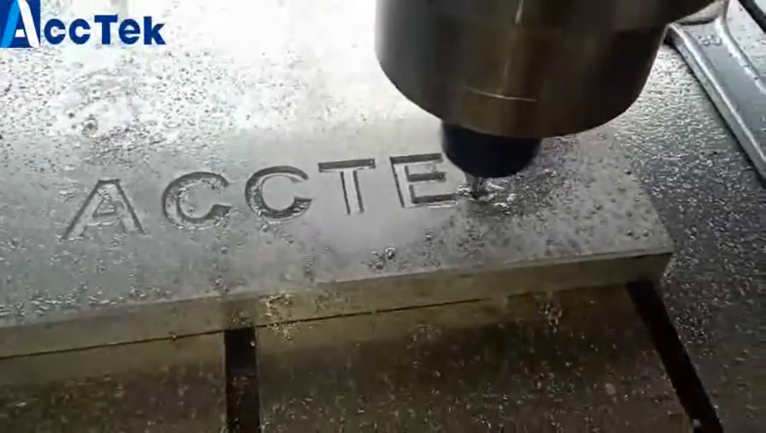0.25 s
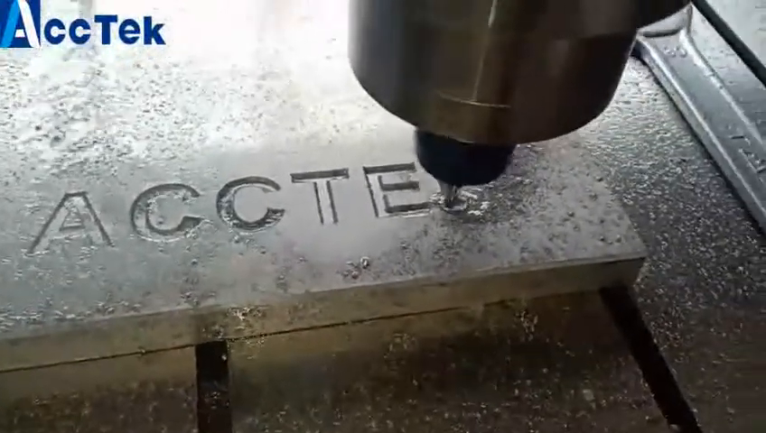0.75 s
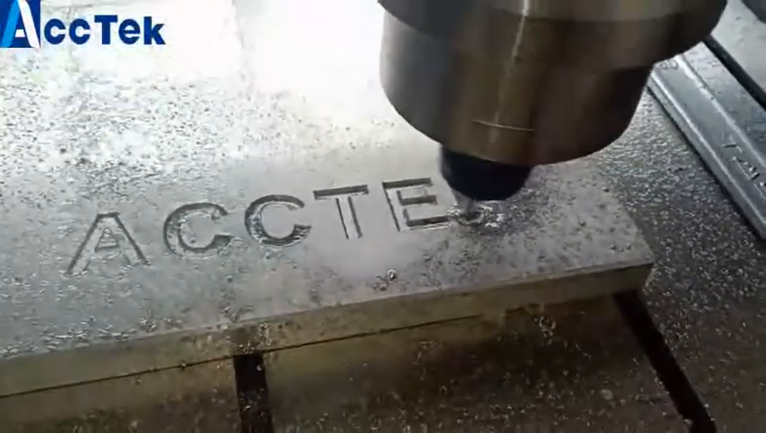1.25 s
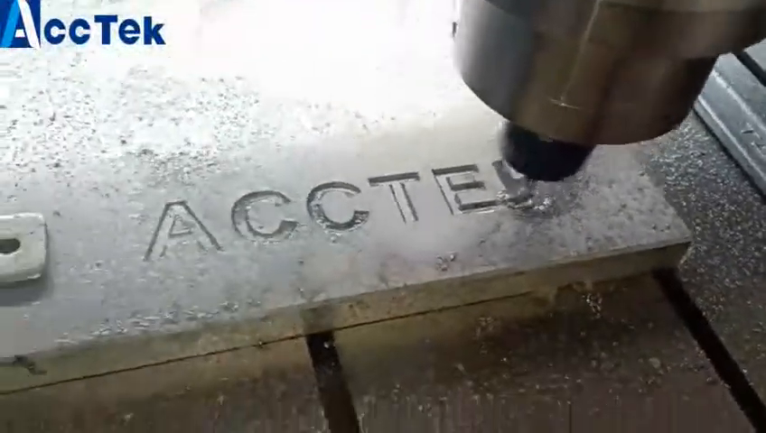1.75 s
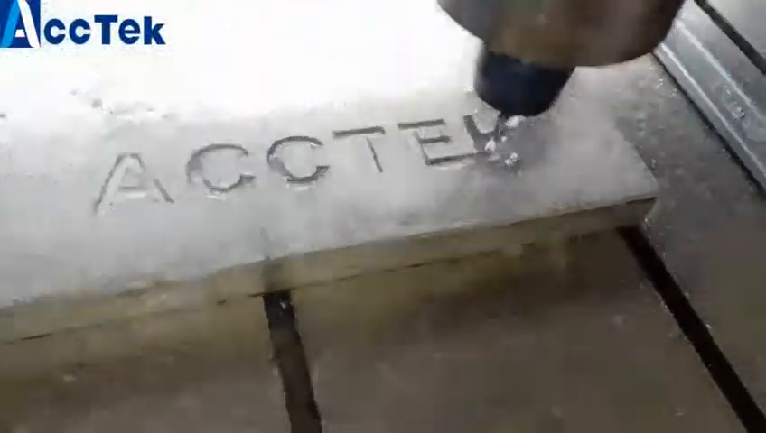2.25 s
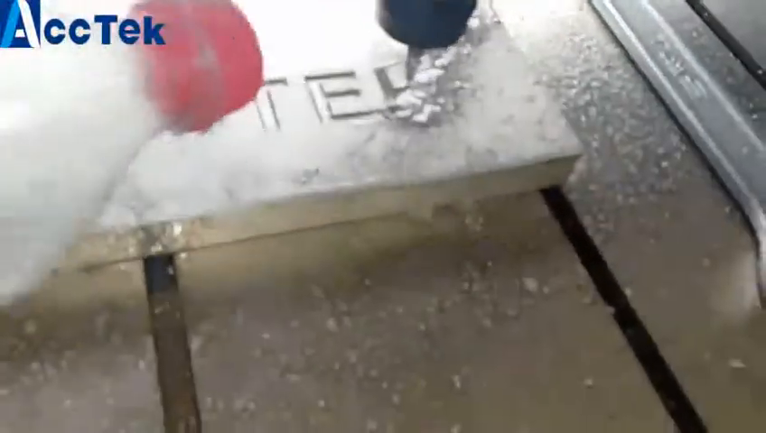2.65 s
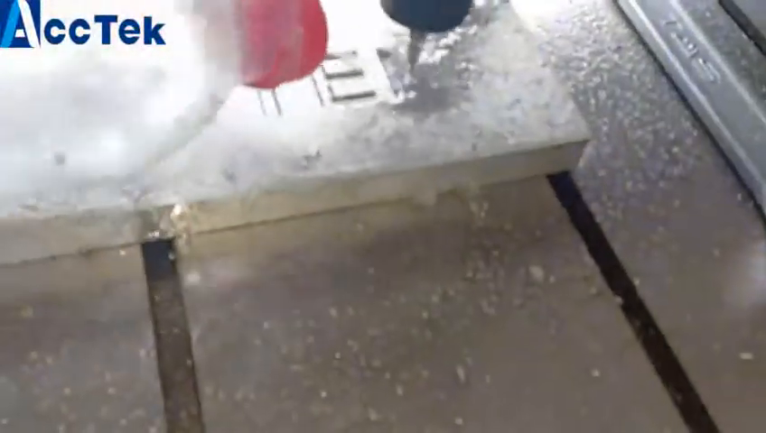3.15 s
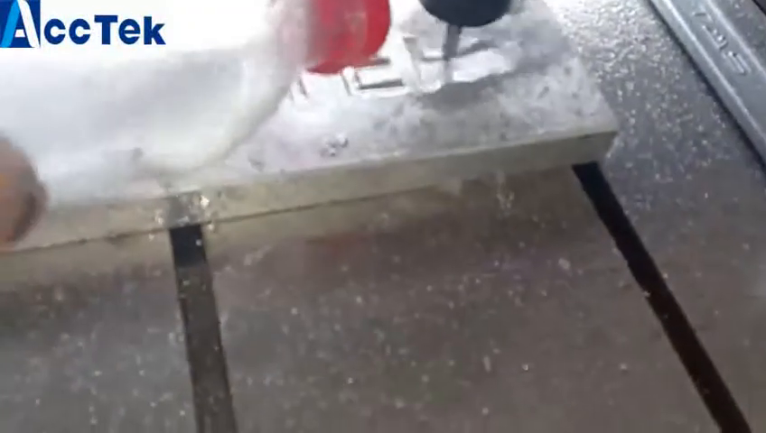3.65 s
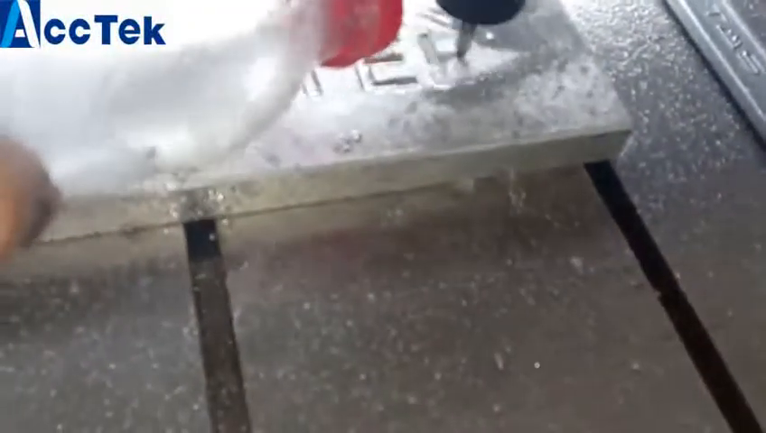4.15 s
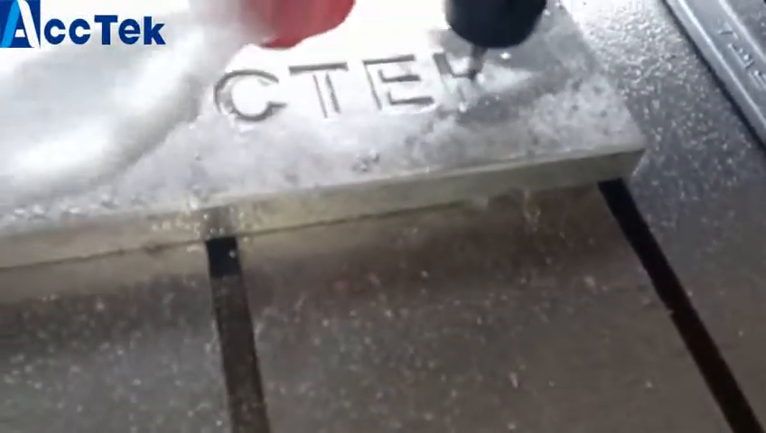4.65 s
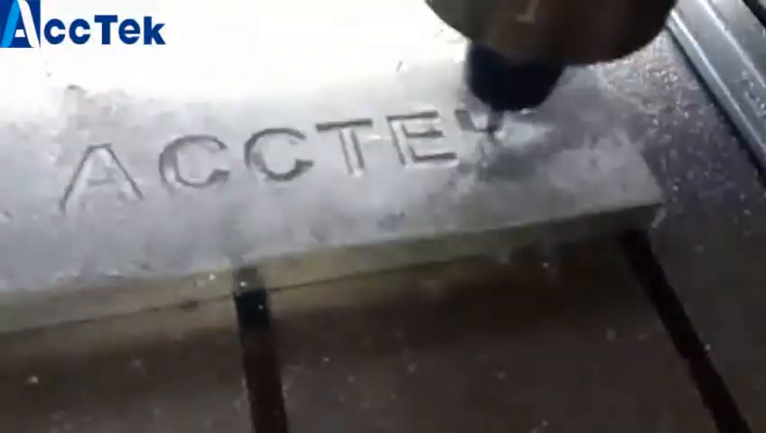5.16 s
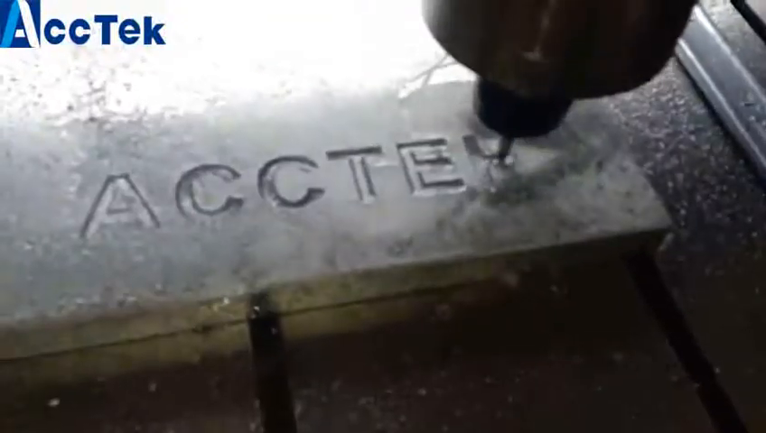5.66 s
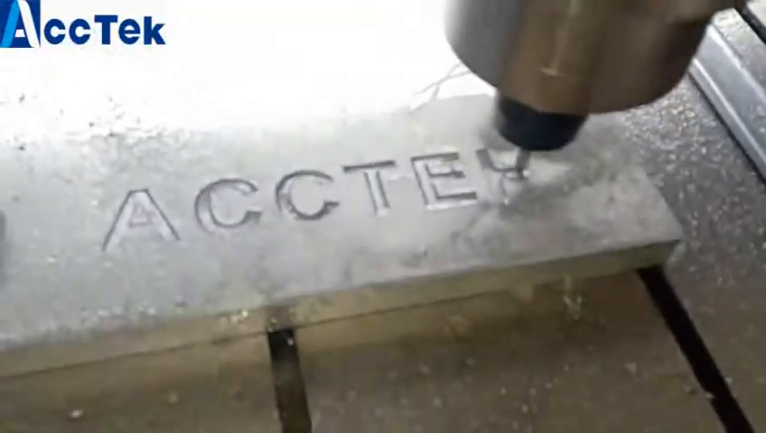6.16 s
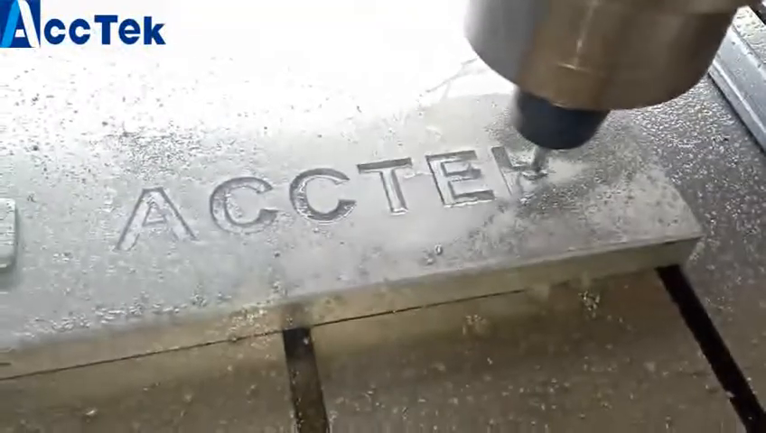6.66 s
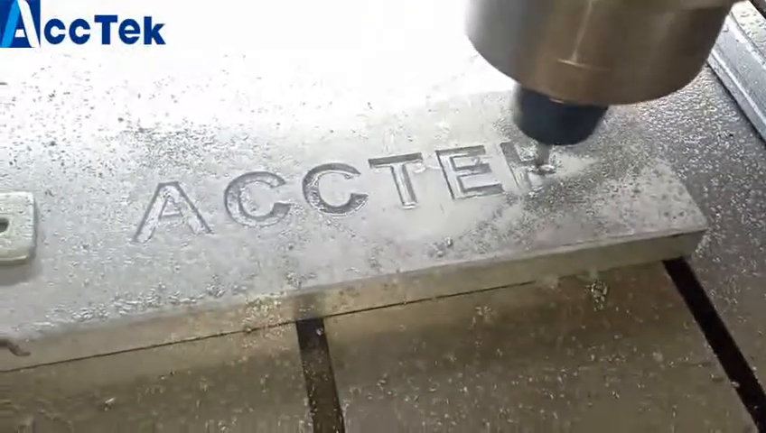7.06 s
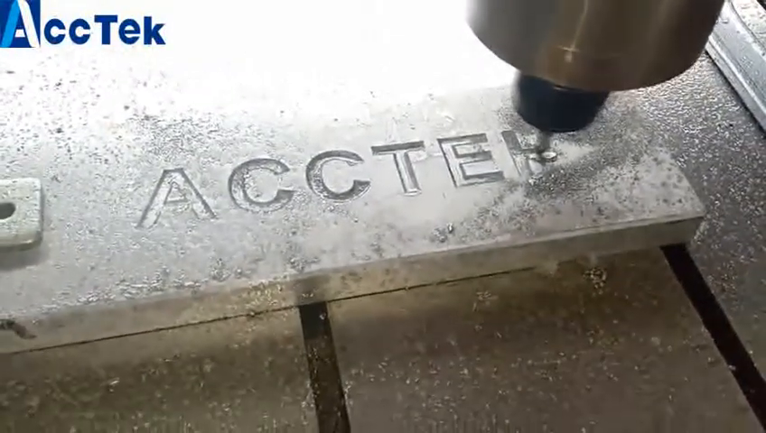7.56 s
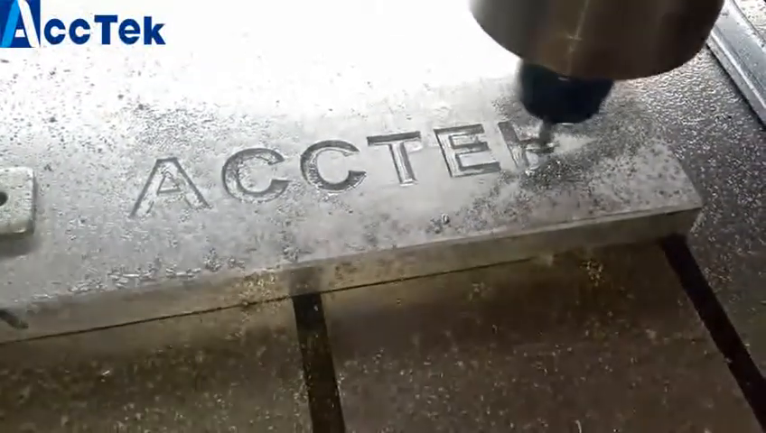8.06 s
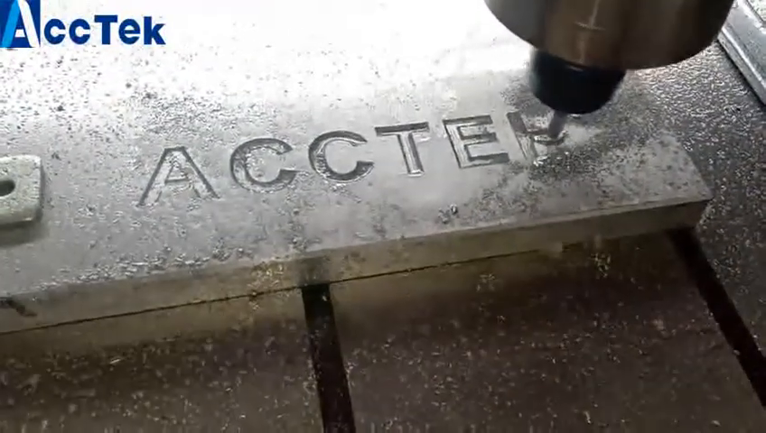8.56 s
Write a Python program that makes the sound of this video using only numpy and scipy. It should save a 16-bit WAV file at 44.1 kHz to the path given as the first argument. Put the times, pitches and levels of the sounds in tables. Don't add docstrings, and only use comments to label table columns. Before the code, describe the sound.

A steady spindle drone with rough metallic overtones alternates between two timbres as the tool zigzags through metal, over gritty chip hiss and a thin electrical whine. The cut stops for about a second and a half, leaving quieter humming, growing bearing whine and swelling workshop rumble. A harsh stuttering plunge with spitting hiss follows, then brighter zigzag cutting carries on. Close, moving hand-held stereo pickup in a workshop.

```python
import sys
import numpy as np
from scipy import signal
from scipy.fft import rfft, irfft, dct
from scipy.io import wavfile
from scipy.ndimage import uniform_filter1d

SR = 44100
rng = np.random.default_rng(int(sys.argv[2]) if len(sys.argv) > 2 else 0)


def digitize_waveform(pressure):
    field = np.atleast_2d(pressure).T
    bounded = np.clip(field, -1, 1)
    quanta = np.round(bounded * 32767).astype(np.int16)
    wavfile.write(sys.argv[1], SR, quanta)


def volts_from_decibels(level):
    exponent = np.asarray(level, float) / 20
    return 10 ** exponent


N = 388080

SPINDLE_HZ = 317.15
LIFT_S, PLUNGE_S, SECOND_S = 1.635, 3.203, 3.93
SPRAY_S = (3.27, 3.64)
USUAL_FLOW_DB = -48


def in_time(rows):
    s, *columns = np.transpose(rows)
    return [np.interp(np.arange(N) / SR, s, c) for c in columns]


def on_log_axis(points, hz):
    table_hz, db = np.array(points).T
    return np.interp(np.log(hz), np.log(table_hz), db)


def held(rows, place):
    rows = np.array(rows)
    last = np.searchsorted(rows[:, 0], place, "right") - 1
    return rows[np.maximum(last, 0), 1:].T


def during(start_s, end_s):
    t = np.arange(N) / SR
    return 1. * (t > start_s) * (t < end_s)


def drift(rate):
    r = np.exp(-80 * np.pi * rate / SR)
    slow = signal.lfilter([1], [1, -2 * r, r * r], rng.standard_normal(N // 40 + 2002))[2000:]
    return np.interp(np.arange(N) / 40, np.arange(len(slow)), slow / slow.std())


def turning(hz):
    return 2 * np.pi * (hz * np.arange(N) / SR + rng.random())


def gain_of(db):
    return np.interp(np.arange(N), np.arange(0, N, 32), volts_from_decibels(db[::32]))


def dents(rows):
    t = np.arange(0, N, 32) / SR
    loss = sum(db * np.clip(1 - abs(t - s) / max(width, .002), 0, 1) for s, width, db in rows)
    return np.interp(np.arange(N) / SR, t, loss)


def stereo(mid, side):
    return np.array([mid + side, mid - side])


def side_share(left_db, lead_rad):
    ratio = volts_from_decibels(left_db[::32]) * np.exp(1j * lead_rad[::32])
    share = (ratio - 1) * np.conj(ratio + 1) / (abs(ratio + 1) ** 2 + 0.067)
    return np.interp(np.arange(N), np.arange(0, N, 32), share)


def free(ease_s):
    return uniform_filter1d(during(LIFT_S, PLUNGE_S), max(int(ease_s * SR), 1))


# order, level in dB against its leading order on outward strokes, the same on return strokes.
PLATE_PATTERN = [(1, 0, -0.5), (2, -1.5, 2.5), (3, 0, -2), (4, -8.5, -11.5), (5, 2.5, -1),
                 (6, -10.5, -15.5), (7, -16.5, -20.5), (8, -15.5, -22), (9, -13, -15.5), (10, -38, -31.5),
                 (12, -34.5, -33), (13, -26.5, -24), (14, -30, -22), (15, -22, -35), (18, -26, -31.5),
                 (20, -31.5, -46)]
# order, then for outward strokes left over right in dB
EARS = [(1, 4.5, 0.4, 2, -0.9), (2, 6.5, 0.9, 7, 1.25), (3, 1.5, 1.67, 1, 1.5), (4, -9.5, 1.1, -6.5, -2),
        (5, -1.5, 1.55, 0, 1.43), (6, -0.5, 1.7, -2, 0.9), (7, 3, -0.3, 2, -1.34),
        (8, -0.5, -0.7, 1.5, -1.2), (9, -4.5, 2.3, -6, 2.5), (10, -4, -2.85, -0.9, 2.5),
        (12, 2.8, -3, 4, -0.75), (13, 5.1, 2, 12, 3.5), (14, 0.5, 3.5, 4, 2.3), (15, 1, 2.58, 2, -4),
        (18, 4, -2.5, -0.5, 4.5), (20, 5, 3, 2.2, -1.91)]
# time in seconds, extra left lead in radians per order, extra left lean in dB.
HAND = [(0.0, 0.109, -2), (0.5, 0.046, -1.5), (1.0, -0.019, 1), (1.6, -0.111, -1.5), (3.4, 0.252, -1.5),
        (3.8, 0.147, -2.5), (4.1, 0.019, 0.0), (4.7, 0.006, 0.5), (5.3, -0.062, 1), (6.0, -0.087, 0.5),
        (6.8, -0.097, 0.0), (7.6, -0.084, -0.5), (8.2, -0.047, -1), (8.8, -0.072, -0.5)]


def flute(stroke, back, spread_rad):
    straight_db = -24
    zigzag = np.interp(np.arange(N) / SR, [1.55, 1.6, 3.93, 3.98], [1, 0, 0, 1])
    bite_db = bite(stroke)
    dip_db = zigzag * (straight_db - bite_db[3])
    high_db = bite_db[3] + (1 - zigzag) * (0.5 * (bite_db[1] - bite_db[3]) + 5.5)
    fresh_db = 3 * during(3.93, 5.2)
    clearing_db = 4 * uniform_filter1d(during(3.67, 3.92), size=600)
    shaft, out = turning(SPINDLE_HZ), 0
    turn_rad, lean_db = in_time(HAND)
    facing = np.maximum(back, free(0.05))
    for (order, out_db, back_db), ears in zip(PLATE_PATTERN, EARS):
        _, out_left_db, out_rad, back_left_db, back_rad = ears
        if order in (1, 2, 3, 5):
            lead_db = bite_db[min(order, 4) - 1]
        else:
            follows = 0.93 if order < 7 else 0.59
            lead_db = high_db + (1 - follows) * dip_db
        if order == 6:
            lead_db = lead_db + fresh_db
        if order == 4:
            lead_db = lead_db + clearing_db
        uneven_db = (0.9 if order == 5 else min(1.58 + 0.067 * order, 2.2)) * drift(16)
        level = np.sqrt(2) * gain_of(lead_db + out_db + back * (back_db - out_db) + uneven_db)
        lag = spread_rad * order ** 2 + (0.072 + 0.036 * order) * drift(19)
        tone = level * np.exp(1j * (order * shaft + lag))
        left_db = out_left_db + facing * (back_left_db - out_left_db) + lean_db + 1.8 * drift(3)
        lead_rad = out_rad + facing * (back_rad - out_rad) + order * turn_rad
        lead_rad = lead_rad + (0.2 + 0.03 * order) * drift(2)
        out = out + stereo(tone.real, (tone * side_share(left_db, lead_rad)).real)
    return out


# start in seconds, depth of cut in dB,
# sway of the plate in dB, thrust on the table in dB.
TURNS = [(-0.05, -3.5, 0.5, 1), (0.24, 1, -2.5, 0), (0.515, -2, 0, 1), (0.798, 2, -5, 0),
         (1.075, 0.5, -1, -3), (1.349, 3, -3, 1), (1.637, 4, 4, 0), (3.927, 0, -1.5, 5),
         (4.22, -1, -2.5, 1), (4.534, 2, -3.5, -0.5), (4.827, -0.8, 0.5, 3), (5.137, 2.5, -4.5, 0),
         (5.435, 0, 0.6, 0), (5.749, 3, -3.5, 0), (6.048, 0, 1.2, -0.5), (6.37, 2.5, -4, -0.5),
         (6.663, 0, 1.3, 0), (6.982, 2, -4.5, 1), (7.279, -1, 1.5, 0.5), (7.599, 2.3, -3, 0),
         (7.907, -0.4, 1, 0), (8.219, 2, -3.5, 1), (8.525, -1, 1, 2), (8.83, -3, -3, -3)]
# start in strokes (0 to 2), then the bite in dB
FIRST_PASS = [
    (0, -27, -29, -37, -32),
    (.13, -33, -33.5, -37.5, -33),
    (.3, -30, -31.5, -33.5, -26),
    (.8, -31.5, -32.5, -32.5, -36),
    (1.03, -31.5, -35, -34, -33),
    (1.13, -40, -35.5, -30, -30),
    (1.22, -30, -30.5, -32, -24),
    (1.8, -29.5, -31.5, -28.5, -32),
]
# start in strokes, bite in dB of orders 1, 2, 3 and 5.
SECOND_PASS = [(0, -24.5, -32, -33.5, -30.5), (.13, -27.5, -30, -30, -36.5),
               (.19, -35.5, -34.5, -32.5, -25.5), (.32, -31, -31, -29, -24.5), (.6, -31.5, -32, -33, -24.5),
               (.86, -33, -33, -33, -31), (.98, -27, -30.5, -26, -30.5), (1.09, -35, -35.5, -34.5, -29.5),
               (1.17, -28.5, -32.5, -31, -23), (1.4, -30, -33.5, -33.5, -23),
               (1.6, -30.5, -32.5, -33, -23.5), (1.79, -27.5, -31.5, -27.5, -31.5),
               (1.94, -32.5, -28, -46.5, -36)]
# start in seconds, bite in dB of orders 1, 2, 3 and 5.
ENTRY = [(3.203, -43, -44, -42.6, -37), (3.216, -35.1, -24.5, -34, -29), (3.232, -22, -23, -41, -32.2),
         (3.25, -24.5, -24.9, -46, -49), (3.27, -25.5, -42, -41, -41), (3.295, -20.4, -33.5, -37.8, -37),
         (3.32, -26, -25.5, -41, -39), (3.345, -28, -23.5, -39.4, -39), (3.37, -31, -25, -38, -53),
         (3.4, -35.5, -23, -25, -44), (3.43, -28, -21, -38, -45), (3.46, -34, -22.5, -33, -50),
         (3.5, -24.5, -26.5, -45, -62), (3.53, -40, -32, -38.5, -52), (3.56, -30, -31.5, -37.7, -47),
         (3.6, -25.8, -29, -34, -44.5), (3.64, -25, -40, -33, -36), (3.67, -29.0, -36, -41.6, -41),
         (3.7, -23.5, -32.5, -43.5, -40.5), (3.74, -27, -32, -43, -41), (3.77, -28.0, -31, -36, -40),
         (3.8, -27.4, -28, -34, -44), (3.84, -30, -25, -31, -42.4), (3.88, -29.7, -25.1, -31.1, -47),
         (3.905, -36, -28, -43.4, -41)]
# time in seconds, dB over its steady level.
HUM = [(1.69, -9), (1.76, 6), (1.9, -2), (1.99, -8), (2.12, 4), (2.27, 5), (2.4, -3.5), (2.5, 6.5),
       (2.6, 1.5), (2.67, -5), (2.81, 4), (2.92, 2), (3.02, -4), (3.2, -1)]
# time in seconds, loss in dB.
HALTS = [(0.235, 4.0), (0.247, 6), (0.497, 10), (0.537, 19), (0.779, 20.0), (0.826, 10), (1.058, 7),
         (1.122, 9), (1.312, 8), (1.391, 10), (1.592, 11), (3.957, 21), (4.211, 10.0), (4.266, 14.0),
         (4.508, 4), (4.565, 9), (4.818, 16.0), (4.869, 5), (5.116, 12.0), (5.16, 24.0), (5.397, 16),
         (5.483, 19), (5.728, 10), (5.778, 10), (6.012, 7), (6.092, 5), (6.348, 10.0), (6.386, 6),
         (6.625, 5), (6.704, 3), (6.962, 15.0), (7.011, 15), (7.249, 6), (7.328, -3), (7.576, 17),
         (7.62, 13.0), (7.895, 1), (7.94, 6.0), (8.201, 15), (8.248, 6), (8.492, 24.0), (8.573, 0)]


def bite(stroke):
    t = np.arange(N) / SR
    depth_db, sway_db, thrust_db = held(TURNS, t)
    zigzag_db = np.where(t < LIFT_S, held(FIRST_PASS, stroke), held(SECOND_PASS, stroke)) + depth_db
    zigzag_db[1:3] += sway_db
    zigzag_db[0] += thrust_db
    zigzag_db[1] -= 14 * during(4.43, 4.52)
    halt_s = 0.007
    zigzag_db[3] -= dents([(s, halt_s, db) for s, db in HALTS])
    idle_db = np.c_[[-41, -50.5, -65.5, -73]]
    after_db, fade_db_per_s = np.c_[[-40.5, -34.5, -37.5, -50]], np.c_[[60, 304, 46, 60]]
    beat = volts_from_decibels(np.c_[[1, .3, 0, 0]] * in_time(HUM)[0])
    after = volts_from_decibels(after_db - fade_db_per_s * np.clip(t - LIFT_S, 0, 2))
    free_db = 20 * np.log10(volts_from_decibels(idle_db) * beat + after)
    lifted_db = np.where(t < PLUNGE_S, free_db, held(ENTRY, t))
    db = np.where((t < LIFT_S) | (t > SECOND_S), zigzag_db, lifted_db)
    ease = int(0.011 * SR)
    return uniform_filter1d(uniform_filter1d(db, ease), ease)


def strokes():
    return np.interp(np.arange(N) / SR, np.array(TURNS)[:, 0], np.arange(len(TURNS))) % 2


# time in seconds, level in dB.
CHATTER = [
    (3.24, -49),
    (3.378, -33.5),
    (3.62, -42.5),
]


def chatter():
    gate = np.interp(np.arange(N) / SR, [3.24, 3.3, 3.56, 3.62], [0, 1, 1, 0])
    swing = turning(465.5) + 0.48 * drift(5.4)
    shaft = turning(SPINDLE_HZ)
    tone = np.cos(swing) + volts_from_decibels(-3) * np.cos(swing + shaft) + volts_from_decibels(-13.0) * np.cos(swing - shaft)
    tone = tone + volts_from_decibels(-15.5) * np.cos(2 * shaft - swing) + volts_from_decibels(-3) * np.cos(5 * swing)
    return np.sqrt(2) * volts_from_decibels(in_time(CHATTER)[0]) * gate * stereo(tone, 0.66 * np.roll(tone, 25))


# pitch in Hz, width in Hz, usual level in dB, level in dB in that part, that part from and to
RINGS = [(302.5, 27, -43.5, -35.5, 1.2, 0.92), (1114, 72, -43, -41.5, 0.1, 1.2),
         (1018, 68, -49, -43.5, 0.018, 1.3), (2722, 13, -52.5, -34.5, 2.2, 2.1),
         (2666, 50, -41.5, -72, 0.18, 1.7), (2290, 18, -70.5, -57.5, 0.25, 0.29),
         (4305, 40, -60, -46, 1.66, 2.1), (4173, 62, -66, -48.5, 1.1, 1.75),
         (4740, 62, -58, -51.5, 0.058, 1.6), (5630, 23, -65.5, -47, 1.74, 1.906),
         (6370, 72, -71, -48.5, 1.854, 2.8)]


def rings(stroke, plate_db):
    effort_db, out = np.minimum(2.9 * (plate_db + 48.5), 2.5), 0
    chips = rng.standard_normal((2, N))
    for hz, width, usual_db, loud_db, start, end in RINGS:
        r = np.exp(-np.pi * width / SR)
        section = [1, 0, -1, 1, -2 * r * np.cos(2 * np.pi * hz / SR), r * r]
        mid, side = signal.sosfilt([section, section], chips)
        squeal = (hz > 5000) * during(3.69, 3.9)
        loud = uniform_filter1d(1. * (stroke > start) * (stroke < end) + squeal, size=900)
        level = gain_of(effort_db + usual_db + loud * (loud_db - usual_db) + 1.5 * drift(4))
        out = out + level * stereo(mid, (0.6 if hz < 1500 else 0.89) * side) / mid.std()
    return out


# from Hz, to Hz.
NOISE_BANDS = [
    (80, 220),
    (1680, 1820),
    (3250, 3750),
    (13100, 13900),
]
# frequency in Hz, level in dB per Hz.
RUMBLE = [(20, -80), (40, -73.5), (70, -64.5), (110, -54), (145, -45), (190, -54), (240, -57.5)]
# frequency in Hz, level in dB per Hz.
CUT = [(480, -56.5), (790, -54.5), (1430, -57), (1750, -49.5), (2200, -53.5), (2750, -50.5), (3250, -56.5),
       (4550, -54), (5300, -56.5), (6600, -70.5), (8000, -79.5), (12300, -80), (13300, -76.5), (14100, -80),
       (15500, -87.5)]
# frequency in Hz, likeness from 0 to 1.
LIKENESS = [(25, .85), (60, .97), (200, .99), (500, 0.45), (900, .35), (1300, .3), (1700, 0.07), (5000, .0),
            (12000, 0.0)]
# frequency in Hz, change in dB.
SPRAY_TILT = [(5800, -0.5), (8200, -2.9), (11600, -2.5), (16400, 11.5)]


def noises(levels_db, pulse, patchy_db):
    t = np.arange(N) / SR
    hz = np.maximum(np.fft.rfftfreq(N, 1 / SR), 1)
    colour = volts_from_decibels(on_log_axis(RUMBLE + CUT, hz))
    alike = np.clip(on_log_axis(LIKENESS, hz), 0, .99)
    mid, side = rfft(rng.standard_normal((2, N))) * colour * (hz < 17000)
    pair = np.array([mid, side * np.sqrt((1 - alike) / (1 + alike))])
    standing = [np.sqrt(2 * np.sum(colour[(hz > lo) & (hz < hi)] ** 2) / N) for lo, hi in NOISE_BANDS]
    gains_db = levels_db - 20 * np.log10(standing)[:, None]
    gains_db[2] += 0.3 * np.maximum(gains_db[2] - np.median(gains_db[2]), 0)
    gains_db[3] += 2.5
    steady = np.interp(t, [LIFT_S - .05, LIFT_S, SECOND_S, SECOND_S + .1], [0, 1, 1, 0])
    patchy_db = patchy_db * (1 - 0.67 * steady)
    together = drift(6)
    swell = 1 + pulse * np.cos(turning(SPINDLE_HZ))
    spray = np.interp(t, [SPRAY_S[0] - .02, SPRAY_S[0], SPRAY_S[1], SPRAY_S[1] + 0.042], [0, 1, 1, 0])
    spit = np.tanh(drift(35))
    anchors, out = np.log2([220, 600, 2900, 3600, 6500, 13000]), 0
    for octave in np.arange(4.5, 14.5, .5):
        share = np.clip(1 - 2 * abs(np.log2(hz) - octave), 0, 1)
        place = np.interp(octave, anchors, [0, 1, 1, 2, 2, 3])
        lower = min(int(place), 2)
        gain_db = gains_db[lower] + (place - lower) * (gains_db[lower + 1] - gains_db[lower])
        spray_db = on_log_axis(SPRAY_TILT, 2 ** octave) + 3.5 * spit * (octave > 12)
        spray_db = spray_db + 3.5 * (octave in (13, 13.5))
        patches_db = patchy_db * min(1, 1.8 - .5 * place) * (0.22 * together + drift(11.6))
        gain = gain_of(gain_db + spray_db * spray + patches_db)
        if place > .5:
            gain = gain * swell
        lean = volts_from_decibels(2.5 * np.clip(place - 1, 0, 1) * np.c_[[1, -1]])
        out = out + gain * lean * stereo(*irfft(pair * share, N))
    return out


# time in seconds, level in dB.
CHIP_FLOW = [(0, -54.5), (.4, -51.5), (.8, -54), (.97, -50), (1.25, -53), (1.5, -49), (1.62, -49.5),
             (1.68, -55), (2.5, -53.5), (3.22, -50), (3.29, -39.5), (3.44, -40.5), (3.61, -45.5),
             (3.69, -48.5), (3.79, -43), (3.9, -42.5), (3.97, -49), (8.8, -49.5)]
# time in seconds, level in dB.
WORKSHOP = [(0, -49.5), (1.2, -48.5), (1.5, -44), (1.9, -50), (2.2, -43.5), (2.7, -46.5), (2.95, -37.5),
            (3.3, -46), (3.7, -43.5), (3.95, -49), (4.45, -43.5), (4.75, -49), (5.1, -46), (5.45, -48),
            (5.7, -46), (6.6, -43), (7.2, -48), (8, -44)]


def noise_levels():
    cut_db, free_db = -44, -49.5
    chips_db, = in_time(CHIP_FLOW)
    extra_db = chips_db - USUAL_FLOW_DB
    plate_db = cut_db + free(0.01) * (free_db - cut_db) + 0.99 * np.minimum(extra_db, 7)
    spray = uniform_filter1d(during(*SPRAY_S), size=1300)
    air_db = -63.5 + .7 * extra_db + 1.5 * spray
    return np.array([in_time(WORKSHOP)[0], plate_db, chips_db, air_db])


# time in seconds, level in dB.
WHINE = [(0, -48.5), (.39, -38.5), (.93, -59), (1.25, -48), (1.44, -51.5), (1.6, -39.5), (2.4, -42),
         (2.52, -48), (2.87, -39.5), (3.2, -41), (3.4, -57), (4.04, -48.5), (4.53, -38.5), (5, -40),
         (5.88, -47.5), (6.35, -57), (6.74, -49.5), (7.79, -40.5), (8.8, -44.5)]
# time in seconds, half width in seconds, loss in dB.
NODES = [(.96, .05, 10), (1.4, .04, 13), (2.31, 0.037, 9), (2.51, .03, 17), (2.72, 0.068, 10),
         (4.65, .07, 9), (4.9, .04, 5), (5.25, .05, 4), (5.84, 0.11, 12), (6.02, .12, -5.5), (6.4, .05, 10),
         (6.98, .12, -4), (7.26, .06, 5), (8.52, .08, 5)]
BEARING_HZ = [4683, 5319, 11028, 14047]
# pitch in Hz, level in dB.
FAINT = [(2170, -58), (3020, -59), (4366, -71), (4926, -56), (8565, -78), (9367, -81), (10002, -72),
         (12297, -66.5), (12933, -79), (13022, -73), (13098, -87), (13412, -80), (13657, -67)]


def whines():
    inverter_hz = 6980
    cut_db, rise_db_per_s = [-53, -66, -66, -61], [9.1, 5, 6, 2.2]
    t = np.arange(N) / SR
    free_s = np.clip(t - LIFT_S, 0, 2) * uniform_filter1d(1. * (t < 3.26), size=2000)
    lines = [(inverter_hz, volts_from_decibels(in_time(WHINE)[0] - dents(NODES) + 1.2 * drift(10)))]
    for hz, db, rise in zip(BEARING_HZ, cut_db, rise_db_per_s):
        lines.append((hz, gain_of(db + rise * free_s + 1.2 * drift(2))))
    wanders = [volts_from_decibels(2.3 * drift(1.3)) for _ in range(4)]
    for k, (hz, db) in enumerate(FAINT):
        lines.append((hz, volts_from_decibels(db) * wanders[k % 4]))
    wobble, sway, out = 0.51 * drift(2.1), 0.8 * drift(0.72), 0
    for hz, level in lines:
        phase = turning(hz) + wobble
        out = out + np.sqrt(2) * level * stereo(np.cos(phase), 0.77 * np.cos(phase + 1.66 + sway))
    return out


# frequency in Hz, level in dB per Hz.
SHOP = [(250, -80.5), (330, -54), (700, -66.5), (1300, -73.5), (2000, -92)]


def shop(level_db):
    hz = np.maximum(np.fft.rfftfreq(N, 1 / SR), 1)
    colour = volts_from_decibels(on_log_axis(SHOP, hz)) * (hz > 200) * (hz < 2500)
    mid, side = irfft(rfft(rng.standard_normal((2, N))) * colour, N)
    return volts_from_decibels(level_db + 1.7 * drift(5.5)) * stereo(mid, 0.67 * side) / mid.std()


def scene():
    stroke, levels_db = strokes(), noise_levels()
    back = uniform_filter1d(1. * (stroke > 1), size=2200)
    cutting = flute(stroke, back, spread_rad=1.4) + rings(stroke, levels_db[1]) + chatter()
    return cutting + noises(levels_db, pulse=.2, patchy_db=3.0) + shop(level_db=-48.5) + whines()


# frequency in Hz, step in dB.
ROUNDING = [(300, -32), (3000, -32), (4300, -33.5), (5200, -37), (6000, -39.5), (7000, -36), (7900, -37.5),
            (9000, -42), (10500, -35.5), (11800, -37), (12700, -37.5), (13400, -40.5), (15000, -40.5)]
# from seconds, to seconds, top in Hz.
STARVED = [(0, .55, 9900), (.55, .82, 8600), (.92, 1.42, 9300), (1.62, 3.27, 9900), (3.66, 4.65, 8900),
           (4.65, 5.2, 9800), (5.2, 6.1, 8250), (6.6, 8.8, 8250)]


def thrift(x, scatter_db):
    grid, hop = 134, 1024
    count = N // hop + 2
    s = (grid + hop * (np.arange(count + 1) - .5)) / SR
    lifted = (s > LIFT_S) * (s < SPRAY_S[0])
    sine = np.sin(np.pi * (np.arange(hop) + .5) / (2 * hop))
    kaiser = signal.windows.kaiser_bessel_derived(2 * hop, 4 * np.pi)[:hop]
    rise = np.where(lifted[:, None], kaiser, sine)
    window = np.concatenate([rise[:-1], rise[1:, ::-1]], axis=1)
    padded = np.pad(stereo(*x) / 2, ((0, 0), (hop - grid, count * hop - N + grid)))
    blocks = padded.reshape(2, -1, hop)
    frames = np.concatenate([blocks[:, :-1], blocks[:, 1:]], axis=2) * window
    a, b, c, d = np.split(frames, 4, axis=2)
    lines = dct(np.concatenate([-c[..., ::-1] - d, a - b[..., ::-1]], axis=2), 4, norm="ortho")
    hz, s = (np.arange(hop) + .5) * SR / (2 * hop), s[:-1]
    flow_db = np.interp(s, *np.transpose(CHIP_FLOW)) - USUAL_FLOW_DB - 0.45 * lifted[:-1]
    flow_db += 1.5 * (s > SPRAY_S[0]) * (s < SPRAY_S[1])
    starved = 0
    for start, end, top_hz in STARVED:
        starved = starved + np.outer((s > start) * (s < end), (hz > 7400) * (hz < top_hz))
    scatter = 2 * uniform_filter1d(rng.standard_normal((count, 64)), size=4, axis=0)
    uneven_db = scatter_db * np.repeat(scatter, 16, axis=1)
    step = volts_from_decibels(on_log_axis(ROUNDING, hz) + flow_db[:, None] + uneven_db + 13 * starved)
    lines = np.sign(lines) * step * np.floor((abs(lines) / step) ** .75 + .4054) ** (4 / 3)
    u, v = np.split(dct(lines, 4, norm="ortho"), 2, axis=2)
    frames = np.concatenate([v, -v[..., ::-1], -u[..., ::-1], -u], axis=2) * window
    joined = (frames[:, 1:, :hop] + frames[:, :-1, hop:]).reshape(2, -1)
    return stereo(*np.concatenate([frames[:, 0, hop - grid:hop], joined], axis=1)[:, :N])


def low_pass(x):
    return signal.sosfilt(signal.butter(12, 15630, fs=SR, output="sos"), x)


def record(dry):
    mix = thrift(dry, scatter_db=2.6)
    return low_pass(mix)


dry = scene()
out = record(dry)
digitize_waveform(out)
```